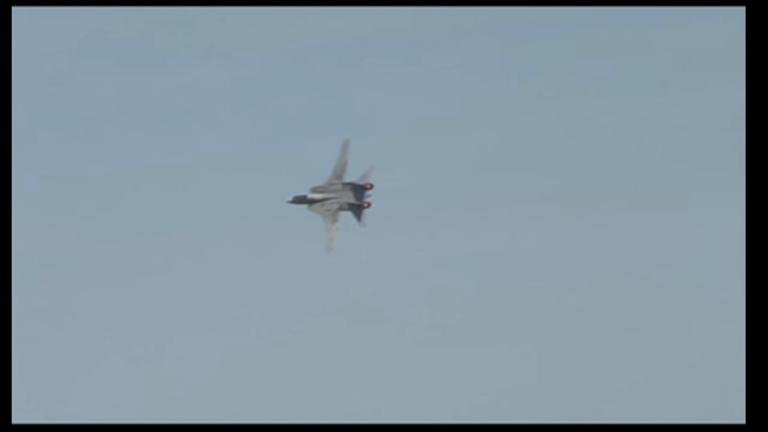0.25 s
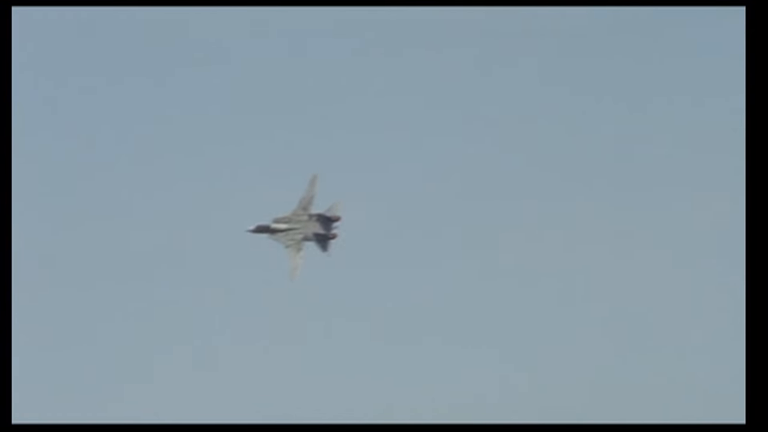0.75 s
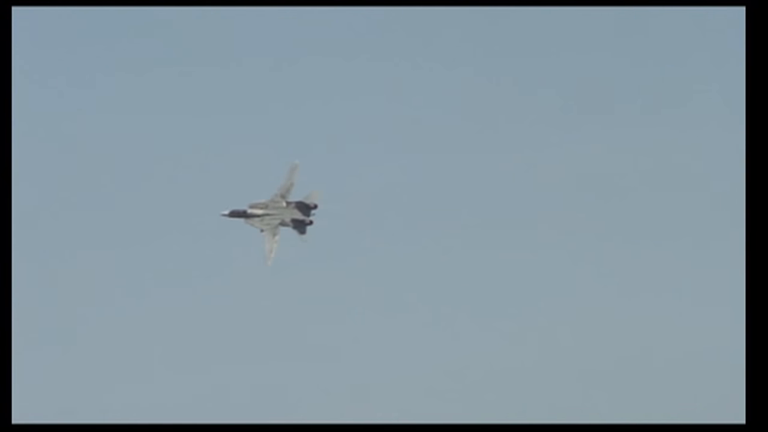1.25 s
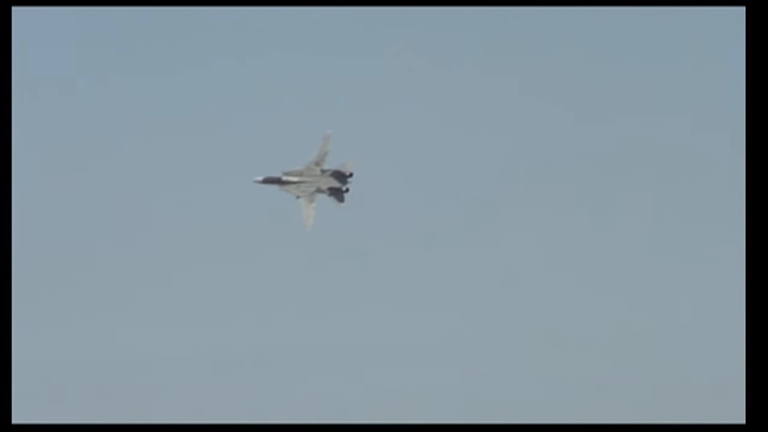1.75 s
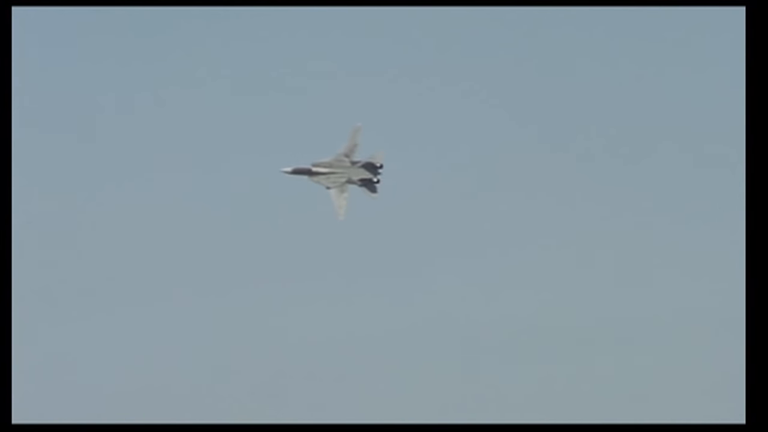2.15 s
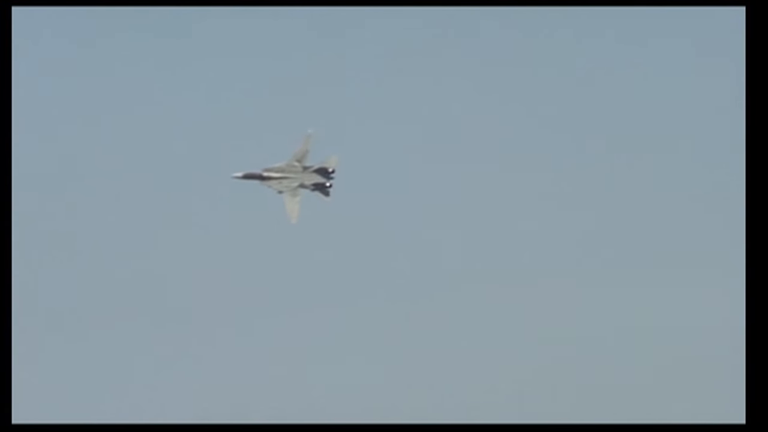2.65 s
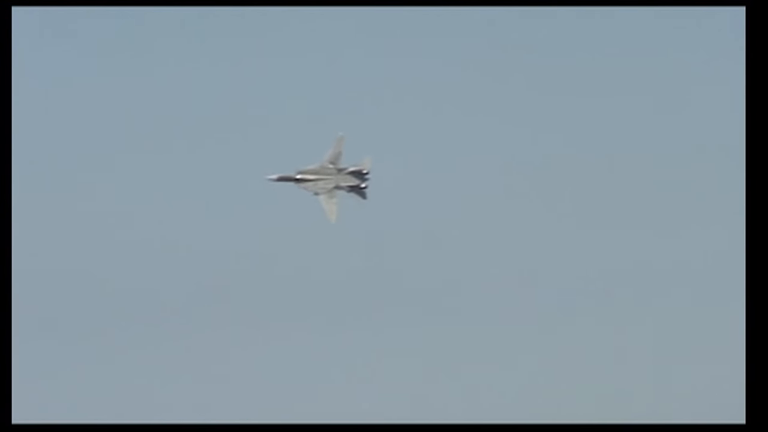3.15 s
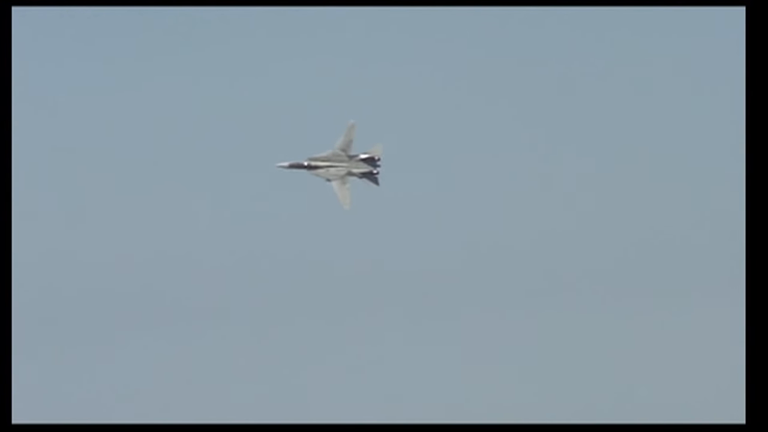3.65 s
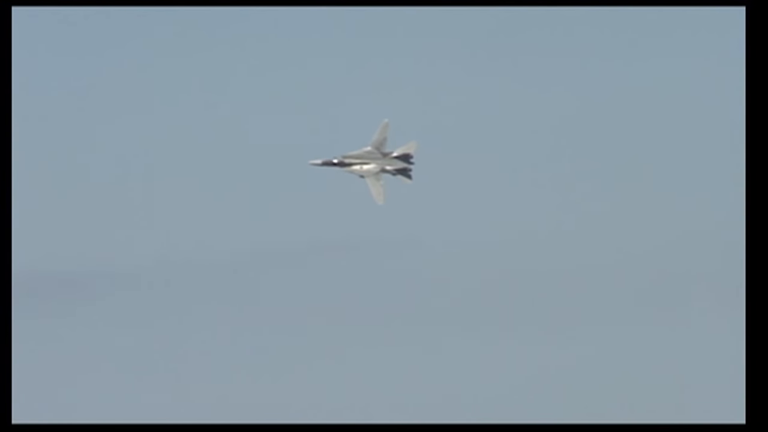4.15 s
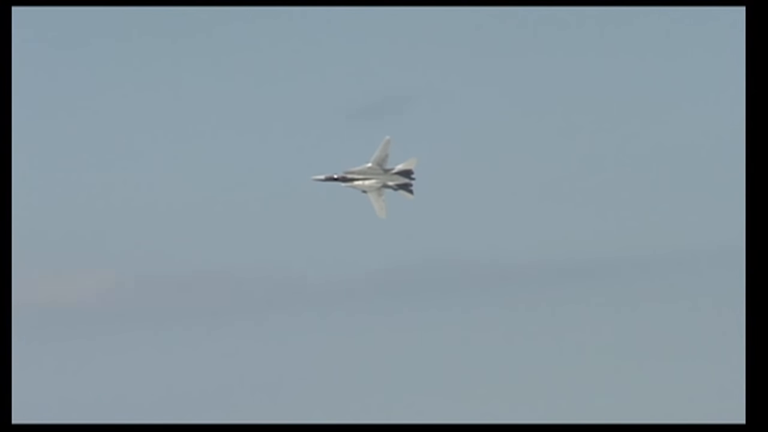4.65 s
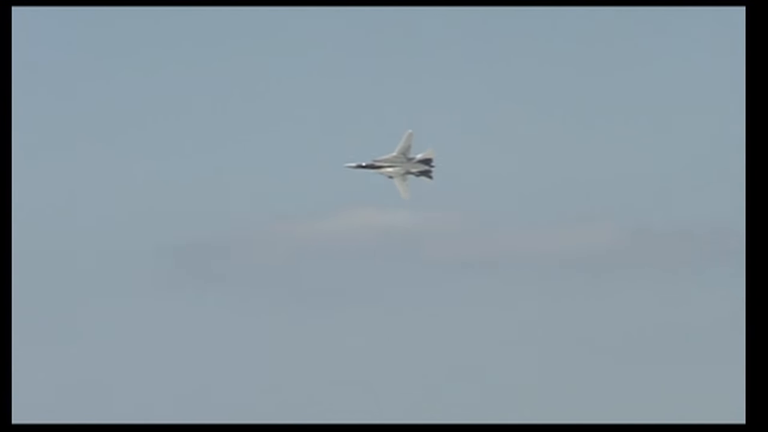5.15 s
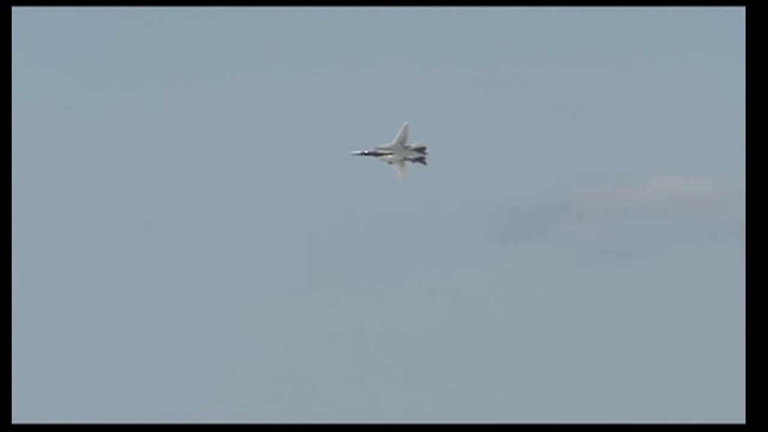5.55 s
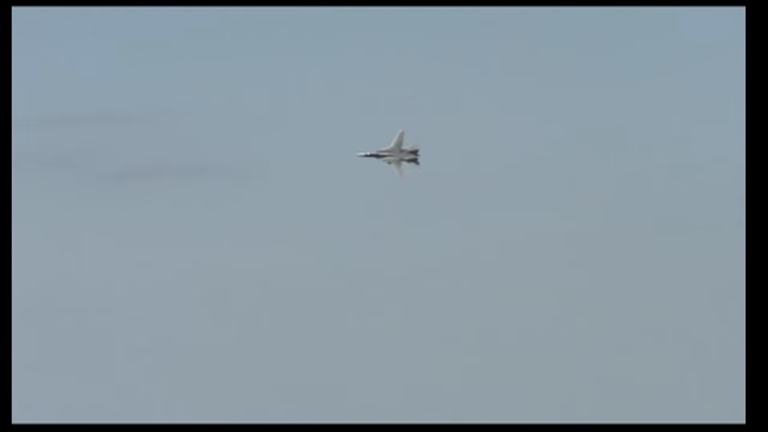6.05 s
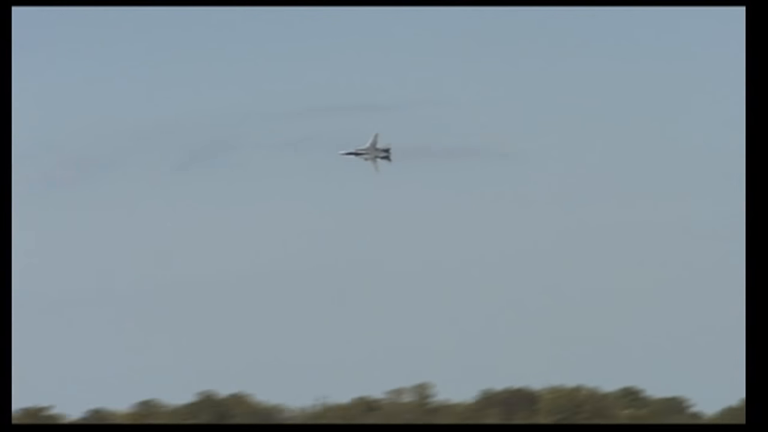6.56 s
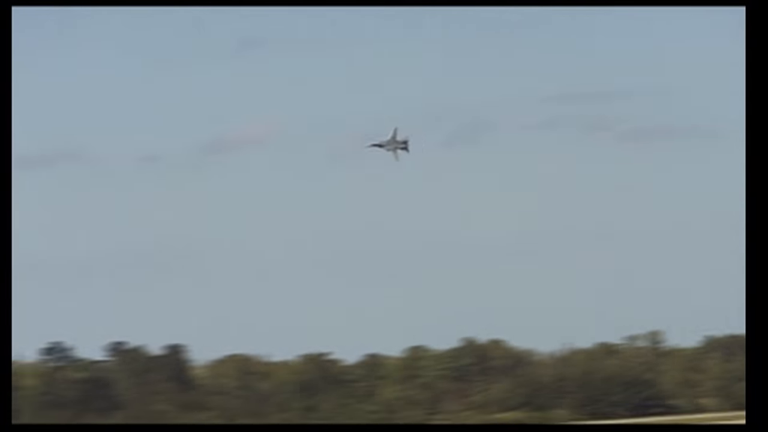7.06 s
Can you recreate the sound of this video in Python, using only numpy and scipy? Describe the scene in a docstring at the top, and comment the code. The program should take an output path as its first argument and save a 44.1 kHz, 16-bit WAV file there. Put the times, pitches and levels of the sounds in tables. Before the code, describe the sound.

A fighter jet circles an airfield in afterburner, heard from a distance and louder on the right. Its deep exhaust roar swells and wavers in the shifting air, with only a few snaps at first. Around the middle, sharp, ragged crackling builds over a rasping edge. The crackle then comes in looser clusters and thins out while the low rumble carries on.

```python
"""An airfield, with a fighter jet circling in afterburner far off to the right. Its turbulent exhaust lays down
a bed of rumble and roar that swells and wanders in the shifting air. Shock fronts crackle on top: loud snaps
with ragged tails, and a swarm of small ones on the roar's crests. The left side hears it all a little later,
with its own tone and more scattered than the right."""
import sys
import numpy as np
from scipy import signal
from scipy.fft import rfft, irfft
from scipy.io import wavfile
from scipy.ndimage import uniform_filter1d

SR = 44100
rng = np.random.default_rng(int(sys.argv[2]) if len(sys.argv) > 2 else 0)


def generate_wav(sig):
    """Save sig (samples, or channels by samples) to the path in sys.argv[1] as 16-bit PCM at SR."""
    pcm = np.round(np.clip(np.atleast_2d(sig).T, -1, 1) * 32767).astype(np.int16)
    wavfile.write(sys.argv[1], SR, pcm)


N = 321489
TIME = np.arange(N) / SR
HZ = np.maximum(np.fft.rfftfreq(N, 1 / SR), 1.)

# short surges and lulls in the roar: t/s, level/dB, half-width/s, f/Hz
GUSTS = [(.1, -5, .2, 111), (0.114, 2.5, 0.049, 2480), (.12, 5, .08, 4300), (0.196, 6.5, .08, 324),
         (0.357, 4.5, .04, 1220), (0.748, 2.5, 0.069, 45), (.95, -3.5, .3, 70.1), (1.176, 6, 0.061, 597),
         (1.3, 2, .3, 2700), (1.52, 2.5, 0.046, 600), (1.801, 5.5, 0.055, 200), (1.933, 3.5, .05, 340),
         (1.66, 3.5, .08, 242), (1.86, -3, 0.053, 330), (2.002, -3.5, 0.072, 170), (2.223, 4.5, 0.11, 137),
         (2.28, 3.5, .1, 85), (2.3, 1, 0.085, 312), (3.052, 4.5, .15, 331.4), (3.511, 3.5, .15, 281),
         (3.602, -4.5, 0.27, 96), (3.775, 6, 0.11, 182), (3.9, 1.5, 0.23, 182), (3.7, 4, 0.029, 2000),
         (3.872, -4, 0.05, 1500), (3.962, 3.5, .04, 1800), (4.047, -7, 0.057, 171), (4.1, 2, .2, 576),
         (4.118, 2.5, .15, 4000), (4.2, 0.5, .08, 910), (4.28, 2, 0.036, 2000), (4.4, 8, 0.098, 90.5),
         (4.56, 3, .15, 160), (4.58, 2, .01, 1200), (4.8, 3, .25, 372), (4.802, -3.5, 0.065, 59.4),
         (4.986, 3.5, 0.063, 98.8), (5.055, -3.5, .25, 42.1), (5.2, 0, .3, 200), (5.26, 3.5, .05, 1390),
         (5.48, 3, .04, 2500), (5.61, 2.5, .02, 2600), (5.648, -2, .025, 2500), (5.8, 5, 0.066, 100),
         (5.793, 2, .15, 62), (6.054, 6.5, .06, 106), (6.14, 2, .05, 1500), (6.2, 6, 0.12, 256),
         (6.254, -5.5, 0.11, 159), (6.443, 2, .04, 2180), (6.49, 0, .03, 3500), (6.548, 6, 0.27, 64.6),
         (6.637, 8, 0.037, 635), (6.961, 11, 0.083, 490), (7.071, 4.5, 0.068, 2500), (7.1, 2, 0.071, 4500)]
# shade on the left, shifting as the jet moves: t/s, then level/dB at each of SHADE_HZ
SHADE = [(0, 1, 3, -1), (.8, 5, 1, 1.5), (1.8, 1, -3.5, -0.5), (2.6, 3.5, -1, -0.5), (3.2, 3, -2, -1),
         (4.2, 1, 1.5, 1.5), (5, 2, 1.5, 0.5), (5.8, 1.5, 0, 0.5), (6.3, 1.5, -1.5, 0),
         (7.29, -0.5, 3.5, -2.5)]
SHADE_HZ = [300, 900, 2800]
# left side against the right: f/Hz, level/dB, phase/rad, coherence/0-1
LEFT_TONE = [(30, -1.5, -1.2, 1), (65, -4, -0.4, .95), (111, -4.5, -0.62, 1), (148, -7.5, -.69, 1),
             (186, -7.5, -.8, .83), (220, -9.5, -1, 0.9), (258, -14.5, 0.42, 0.9), (302, -9, 0.74, 0.9),
             (372, -6, -0.33, 0.8), (484, -10.5, -0.12, 0.5), (534, -8.5, 0.21, .72), (624, -6, -0.32, 0.7),
             (760, -6.5, 0.51, 1), (920, -7.5, 0.38, .62), (1050, -4, 1, 0.4), (1280, -3, 1.0, 0.4),
             (1490, -4, 0.53, 0.6), (2100, -5, .2, 0.2), (2500, -5, 0.73, 0.5), (2950, -5, -0.12, .4),
             (3460, -5.5, 0.94, .16), (4200, -4.5, -.5, 0.5), (5400, -1, 0, 0)]
# base tone of the exhaust: f/Hz, level/dB
EXHAUST_EQ = [(15, -31), (40, -8), (80, -1), (125, -0.5), (230, -4.5), (310, -6), (370, -8), (450, -12.5),
              (540, -12), (640, -16), (940, -23.5), (1400, -30.5), (2000, -36.5), (2300, -37), (2600, -40),
              (3500, -46), (4600, -58), (5600, -69.5), (8000, -77.5)]
# fader rides on the exhaust: t/s, then level/dB of rumble, growl, roar, tearing and sizzle, at RIDE_HZ
EXHAUST_RIDES = [(0, -1, 5, -2.5, 2, 0), (.5, -5.5, -0.5, -3.5, -3, -2), (1.1, 1.5, -3.5, 1, -0.5, -4),
                 (1.5, -2, -2.5, 4.5, 1.5, -1.5), (1.95, -3.5, -2.5, 7.5, 6, -0.5),
                 (2.3, -5.5, -2, 1.5, 2, -5.5), (2.7, -7, -13, -1, -1, -6), (2.95, -5, -6.5, 1, 4, -0.5),
                 (3.4, -1.5, -0.5, 5, 5.5, 1.5), (3.8, 0, -1, 3.5, -2, 2.5), (4.15, -3, 1.5, 0, -4, 3),
                 (4.4, 5, 0, -2, -3.5, 1.5), (4.95, 11, 5, -2.5, -1.5, 1.5), (5.6, 1.5, 2.5, 0.5, -3, -2),
                 (5.9, -2, 4.5, -3, -3.5, -4), (6.449, 3, -0.5, 0, -3, -1), (6.8, -2.5, 0, 0.5, -2, -2.5),
                 (7.29, -0.5, 9.5, -5.5, 0.5, -0.5)]
RIDE_HZ = [45, 90, 750, 1500, 4100]
# two wandering humps in the roar: t/s, lower f/Hz, lower level/dB, upper f/Hz, upper level/dB
HUMPS = [(0, 125, 5, 320, -2), (.5, 140.8, 0.5, 330, -0.5), (1.1, 255, 5.5, 625, -3),
         (1.801, 189.3, 0.5, 359.5, 4.5), (2.25, 140.3, 8.5, 391, 2.5), (2.699, 163, 4, 462, 0.5),
         (3.2, 174, 8.5, 603, 1.5), (3.599, 231, 5.5, 594, -1.5), (4.1, 329, 6.5, 552, 3.5),
         (4.35, 100.5, 1.5, 533, 6.5), (4.949, 117, 6, 484, 5), (5.501, 140, 9, 463, 2),
         (5.949, 109.3, 1, 296, 1), (6.5, 197.7, 8, 575, -1.5), (6.95, 263.3, 11, 605, -3.5),
         (7.29, 127.5, 5, 490, 2.5)]
# cues for the loud shock fronts: t/s, level/dB, treble tilt/(dB per octave)
SHOCKS = [(.2, -52, -5), (0.361, -54.5, 0), (1.6613, -45.5, -2.5), (3.3832, -53, 8), (3.429, -54.5, -3),
          (3.5194, -54, -7), (3.608, -53.5, 11.5), (3.6381, -47, 2), (3.8571, -46, 3.5), (3.902, -55.5, 0),
          (3.9209, -50.5, -0.5), (3.9389, -50, -2), (3.9527, -42, 1.5), (3.978, -40.5, 1),
          (4.0222, -47, 3.5), (4.051, -43.5, 2), (4.103, -39, 2.5), (4.1202, -46.5, -2), (4.19, -42, 2),
          (4.2162, -51, -3.5), (4.249, -56, 3.5), (4.2714, -46.5, -8), (4.338, -51.5, -3.5),
          (4.3994, -48.5, 8), (4.4647, -51.5, -0.5), (4.544, -51, -4), (4.578, -39.5, 2.5),
          (4.6324, -47.5, 5), (4.7746, -50.5, -5.5), (4.993, -45.5, -10), (5.069, -47.5, 2),
          (5.185, -56, -1), (5.2344, -49, -1.5), (5.269, -44, -1), (5.33, -57, -3), (5.385, -52, -6),
          (5.468, -49, -1), (5.483, -48, 0.5), (5.4952, -40.5, -7), (5.54, -55.5, 3), (5.585, -46.5, -3),
          (5.6087, -47, 3.5), (5.62, -49.5, 2.5), (5.6984, -48, 3), (5.784, -49, 6), (5.858, -52, -1.5),
          (6.139, -48.5, -11), (6.19, -50, -4.5), (6.31, -52, -2.5), (6.422, -49.5, 3), (6.431, -43, 0),
          (6.445, -47.5, 1.5), (6.469, -50.5, -0.5), (6.49, -50, 1), (7.127, -50.5, -1.5)]
# tone of the crackle: f/Hz, level/dB
SHOCK_EQ = [(500, -13), (1500, 2), (2800, -0.5), (4500, -2.5), (5600, -10), (8000, -21), (14000, -34.5)]

GROWL_DB = -25.5  # exhaust at 85-170 Hz, ahead of all swells
HUMP_OCTAVES, GUST_OCTAVES = .33, .45  # half-widths
HOLLOW_DEPTH, HOLLOW_RATIO = .44, .66  # shares of the humps' summed height and of the upper one's pitch
RASP_HZ, RASP_DB, RASP_AT_S, RASP_WIDTH_S = 1890, 7, 4.17, .78  # one swell at the height of the crackle
SURGE_DB, SURGE_WIDTH_S, SURGE_ABOVE_HZ = 2.5, .014, 503  # the upper roar lifts with each loud front
SMALL_DB, SMALL_PER_SIZZLE = -81, 1.8  # small shocks: base level, dB gained per dB of sizzle
SWARM_DB, SWARM_WIDTH_S = -24.5, .018  # their swarm round a loud front, relative to its cue level
TAIL_RISE_S, TAIL_T60_S = .0005, .059
SNAP_DB, SNAP_DECAY_S = 16.5, .00004  # the pressure jump, relative to its tail
LEFT_LAG_S, TILT_TOP_HZ = 8 / SR, 7000
SATURATION, HIGH_CUT_HZ = .6, 13400


def undb(db):
    """dB to gain."""
    return 10 ** (np.asarray(db) / 20)


def on_log(hz, points_hz, values):
    """Values joined by straight lines on a log-frequency axis."""
    return np.interp(np.log(hz), np.log(points_hz), values)


def eq(x, table):
    """Shape x by a table of f/Hz, level/dB."""
    return irfft(rfft(x) * undb(on_log(HZ, *np.transpose(table))), N)


def band(x, low_hz, high_hz):
    """Band-pass without delay."""
    return signal.sosfiltfilt(signal.butter(2, [low_hz, high_hz], "band", fs=SR, output="sos"), x)


def bell(offset, width):
    """Bell curve: 1 at the centre, 1/e one width away."""
    return np.exp(-(offset / width) ** 2)


def lanes(table):
    """One automation lane for each column after t/s."""
    times, *columns = np.transpose(table)
    return np.array([np.interp(TIME, times, column) for column in columns])


def wobble(rate_hz):
    """Random steps, smoothed twice; spread near 1."""
    hold = int(SR / rate_hz)
    steps = np.repeat(rng.standard_normal(N // hold + 1), hold)
    return 1.3 * uniform_filter1d(uniform_filter1d(steps, hold), hold)[:N]


def around_shocks(sizes, width_s):
    """A bell-shaped swell of the given size round each loud front."""
    t = TIME[::64]
    bells = bell(t[:, None] - np.transpose(SHOCKS)[0], width_s)
    return np.interp(TIME, t, bells @ sizes)


def shifting_air(hz):
    """Stereo level/dB of the band at hz: gusts move both sides, shade only the left."""
    t = TIME[::256]
    at_s, db, width_s, centre_hz = np.transpose(GUSTS)
    gusts = bell(t[:, None] - at_s, width_s) @ (db * bell(np.log2(hz / centre_hz), GUST_OCTAVES))
    shade = np.interp(t, np.transpose(SHADE)[0], [on_log(hz, SHADE_HZ, row[1:]) for row in SHADE])
    return np.array([np.interp(TIME, t, side) for side in (gusts + shade, gusts)])


def left_side(direct, scattered):
    """A late copy of the direct sound, with its own level and phase at each pitch, blended with an independent
    scattered rendering."""
    hz, db, phase, coherence = np.transpose(LEFT_TONE)
    coherence = np.clip(on_log(HZ, hz, coherence), 0, 1)
    turn = np.exp(1j * (on_log(HZ, hz, phase) - 2 * np.pi * HZ * LEFT_LAG_S))
    blend = coherence * turn * rfft(direct) + np.sqrt(1 - coherence ** 2) * rfft(scattered)
    return irfft(undb(on_log(HZ, hz, db)) * blend, N)


def exhaust_roar():
    """The bed: turbulent noise in third-octave bands that swell, and flutter most in the treble."""
    direct, scattered = (eq(rng.standard_normal(N), EXHAUST_EQ) for _ in range(2))
    growl = irfft(rfft(direct) * ((HZ > 85) & (HZ < 170)), N)
    spectrum = undb(GROWL_DB) / np.std(growl) * rfft([left_side(direct, scattered), direct])
    # scattering evens out the fast grain on the left
    flutter_db = 1.8 * wobble(rate_hz=14) + 3.03 * wobble(rate_hz=130) * np.array([[.6], [1]])
    rides_db = lanes(EXHAUST_RIDES)
    lower_hz, lower_db, upper_hz, upper_db = lanes(HUMPS)
    hollow = (HOLLOW_RATIO * upper_hz, -HOLLOW_DEPTH * (lower_db + upper_db))
    rasp = (RASP_HZ, RASP_DB * bell(TIME - RASP_AT_S, RASP_WIDTH_S))
    surge_db = np.minimum(around_shocks(np.full(len(SHOCKS), SURGE_DB), SURGE_WIDTH_S), 6)
    roar = 0
    for hz in 16 * 2 ** (np.arange(29) / 3):
        window = np.cos(np.pi / 2 * np.clip(3 * np.log2(HZ / hz), -1, 1)) ** 2
        place = on_log(hz, RIDE_HZ, np.arange(len(RIDE_HZ)))  # crossfade the two nearest rides
        below = min(int(place), len(RIDE_HZ) - 2)
        db = (below + 1 - place) * rides_db[below] + (place - below) * rides_db[below + 1]
        for centre_hz, peak_db in ((lower_hz, lower_db), (upper_hz, upper_db), hollow, rasp):
            db += peak_db * bell(np.log2(hz / centre_hz), HUMP_OCTAVES)
        treble_db = hz / (hz + 2600) * flutter_db + hz / (hz + SURGE_ABOVE_HZ) * surge_db
        roar += irfft(spectrum * window, N) * undb(db + shifting_air(hz) + treble_db)
    return roar


def crests(roar):
    """Pressure swing of the roar's body relative to its running strength, and that strength."""
    body = band(roar, 120, 1300)
    strength = np.sqrt(uniform_filter1d(body ** 2, 4000) + 1e-9)
    return body / strength, strength


def steepen(roar, crackle_db):
    """Grit: as the crackle grows, compressions turn peaky and the treble bunches just behind them."""
    swing, strength = crests(roar)
    drive = np.clip(undb(uniform_filter1d(crackle_db, 12000) + 70.5), .15, 1)
    peaky = band(.13 * drive * strength * swing ** 2, 100, 2500)
    bunched = .4 * drive * np.clip(np.roll(swing, 15, axis=-1), -2, 3) * band(roar, 1500, 9000)
    return roar + peaky + bunched


def small_shock_level():
    """Level/dB of the small shocks: it follows the sizzle and swells round each loud front."""
    sizzle_db = lanes(EXHAUST_RIDES)[-1]
    bed_power = undb(SMALL_DB + SMALL_PER_SIZZLE * sizzle_db) ** 2
    swarm_power = around_shocks(undb(np.transpose(SHOCKS)[1] + SWARM_DB) ** 2, SWARM_WIDTH_S)
    return 10 * np.log10(bed_power + swarm_power)


def small_shocks(level_db, swing):
    """Fine crackle, direct and scattered: tiny fronts crowd onto the crests of the roar."""
    size_db = np.minimum(2.5 * rng.exponential(size=N), 9)
    chance = 260 / SR * np.exp(1.1 * np.roll(swing, 8))
    hits = (rng.random(N) < chance) * undb(size_db)
    fade = undb(-60 * TIME[:600] / .008)  # 60 dB down in 8 ms
    envelope = signal.fftconvolve(hits, fade)[:N]
    crackle = eq(envelope * rng.standard_normal((2, N)), SHOCK_EQ)
    return crackle * undb(level_db) / np.std(band(crackle, 4200, 8000))


def loud_shocks():
    """Big cracks, direct and scattered: each steep front is a clean pressure jump with a ragged tail."""
    length, pre_roll = 4096, 64  # samples
    t = TIME[:length]
    octaves = np.log2(np.clip(np.fft.rfftfreq(length, 1 / SR), 1000, TILT_TOP_HZ) / 3500)
    envelope = (1 - np.exp(-t / TAIL_RISE_S)) * undb(-60 * t / TAIL_T60_S)
    snap = undb(SNAP_DB) * np.exp(-t / SNAP_DECAY_S)
    cracks = np.zeros((2, N))
    for at_s, db, tilt_db in SHOCKS:
        tail = envelope * rng.standard_normal((2, length))
        burst = np.roll(snap + tail, pre_roll, axis=-1)
        start = int(at_s * SR) - pre_roll
        cracks[:, start:start + length] += undb(db) * irfft(rfft(burst) * undb(tilt_db * octaves))
    return eq(cracks, SHOCK_EQ)


def scene():
    """The stereo mix: steepened roar underneath, crackle on top, direct sound on the right."""
    roar = exhaust_roar()
    swing, _ = crests(roar[1])
    crackle_db = small_shock_level()
    direct, scattered = loud_shocks() + small_shocks(crackle_db, swing)
    crackle = np.array([left_side(direct, undb(-5.5) * scattered), direct])
    return steepen(roar, crackle_db) + crackle


def record(dry):
    """A thin hiss rides on the loudness of the mix and its treble; peaks are rounded and the top is cut."""
    power = uniform_filter1d(np.mean(dry ** 2, axis=0), 1500) + 1e-9
    treble = band(dry, 3500, 7000)
    treble_power = uniform_filter1d(np.mean(treble ** 2, axis=0), 500) / np.mean(treble ** 2)
    hiss = eq(rng.standard_normal((2, N)), [(2000, -21), (5000, 2), (13000, -3)])
    hiss *= undb([[-62], [-59.5]]) * power ** .25 * treble_power ** .11 / np.std(hiss)
    rounded = SATURATION * np.tanh((dry + hiss) / SATURATION)
    return signal.sosfilt(signal.ellip(8, .2, 60, HIGH_CUT_HZ, fs=SR, output="sos"), rounded)


dry = scene()
out = record(dry)
generate_wav(out)
```